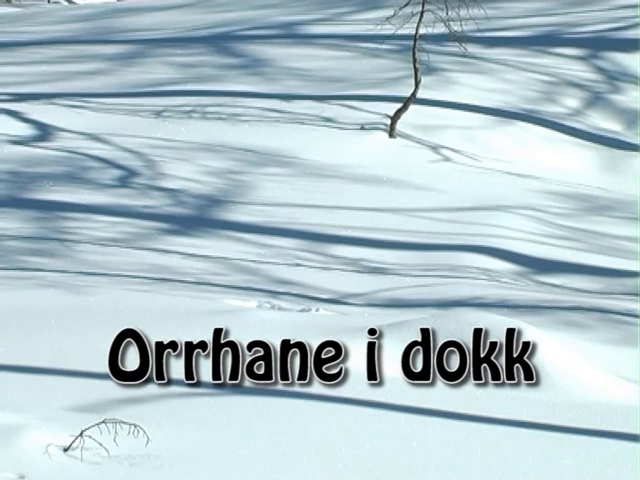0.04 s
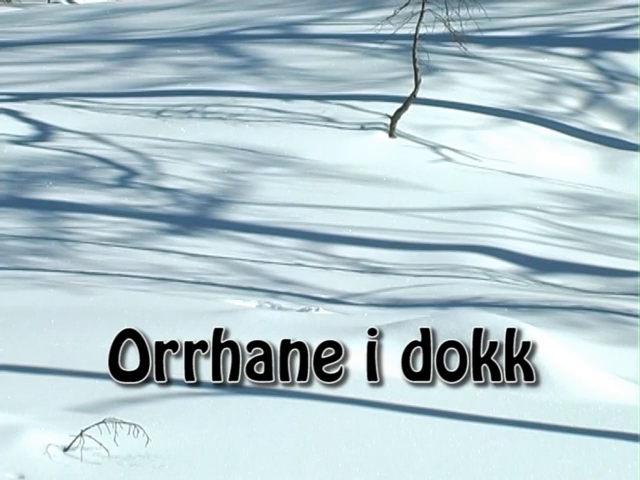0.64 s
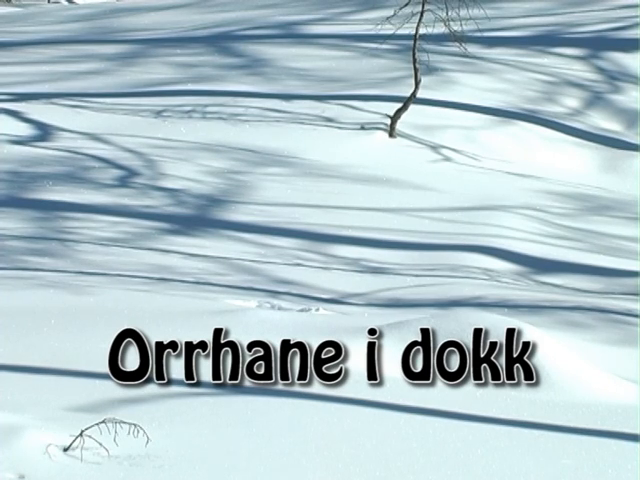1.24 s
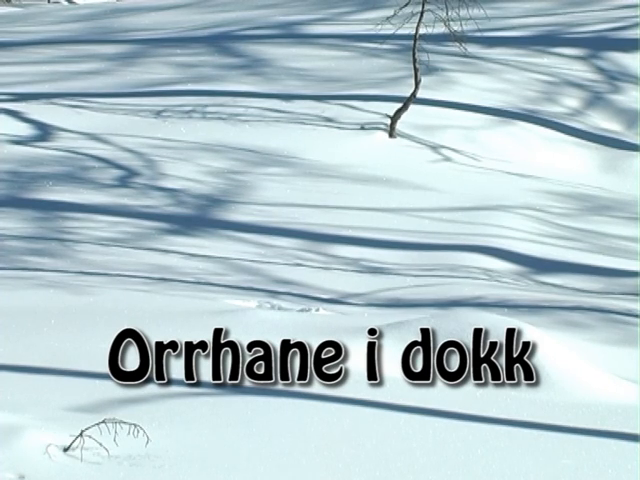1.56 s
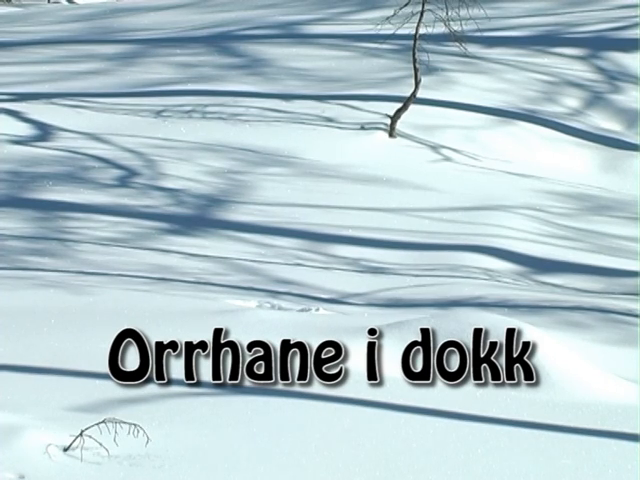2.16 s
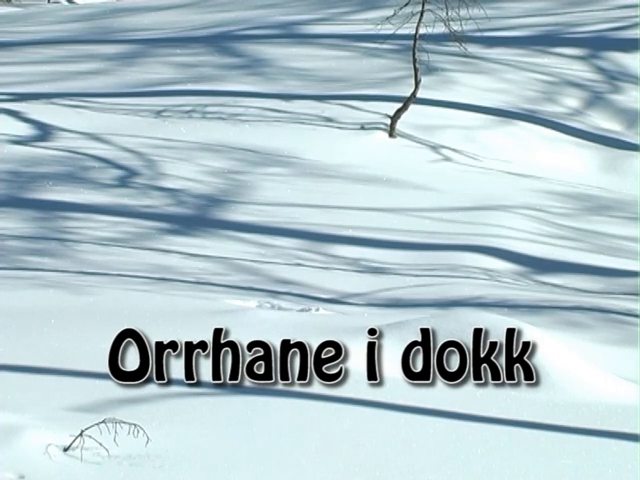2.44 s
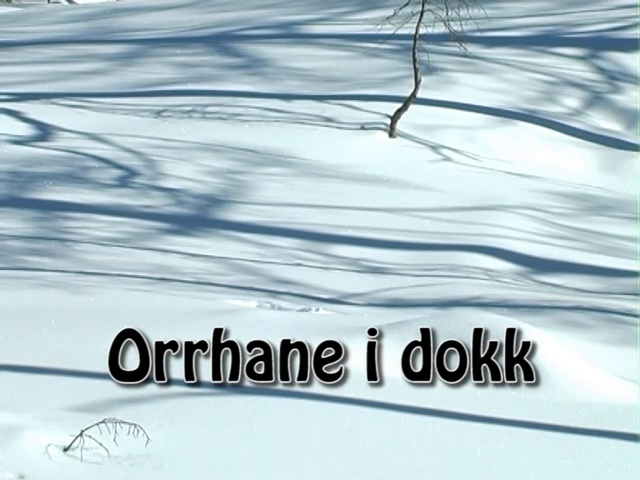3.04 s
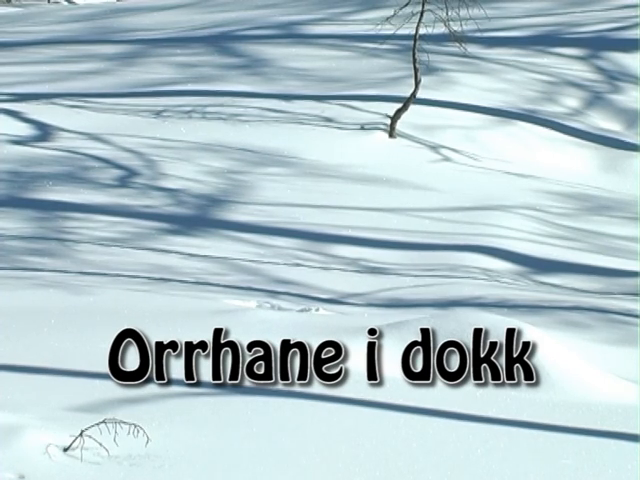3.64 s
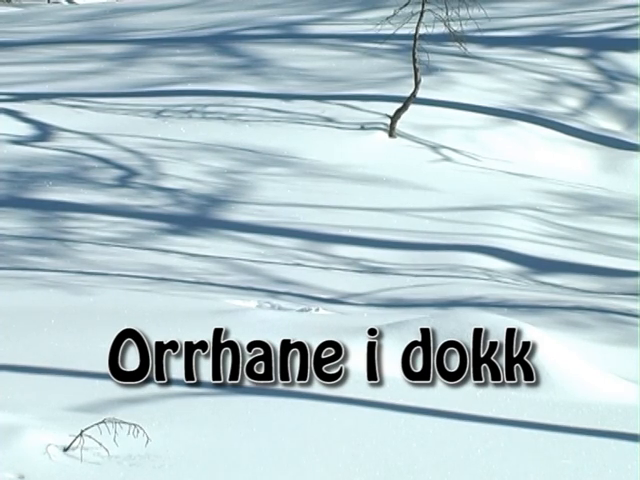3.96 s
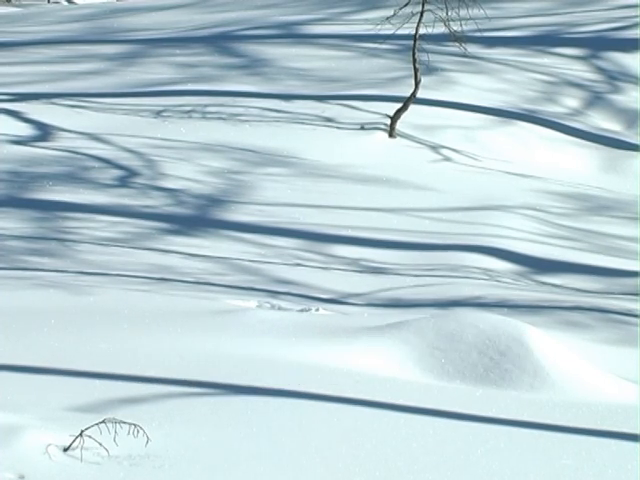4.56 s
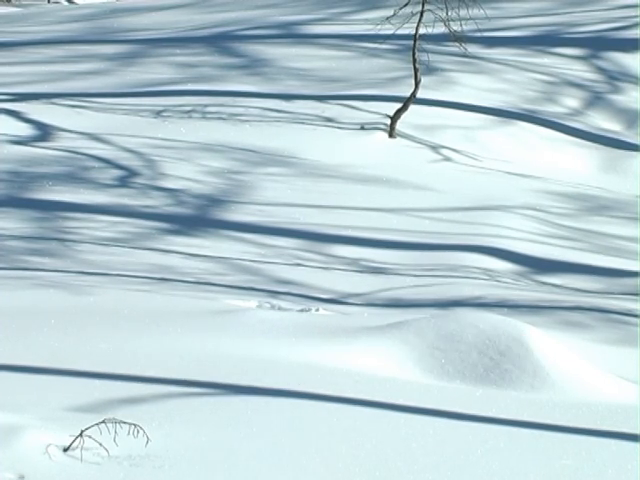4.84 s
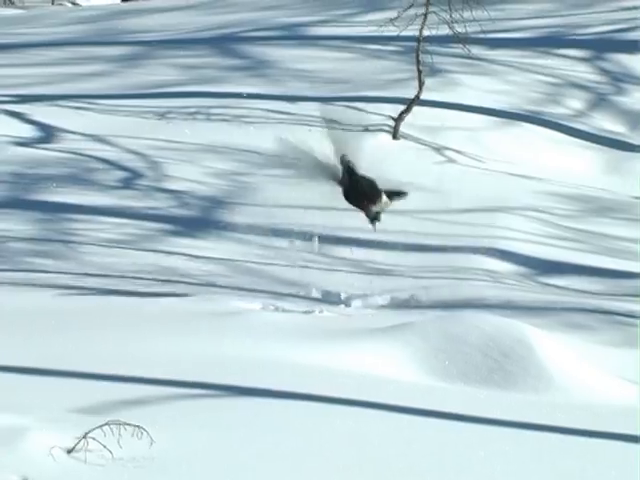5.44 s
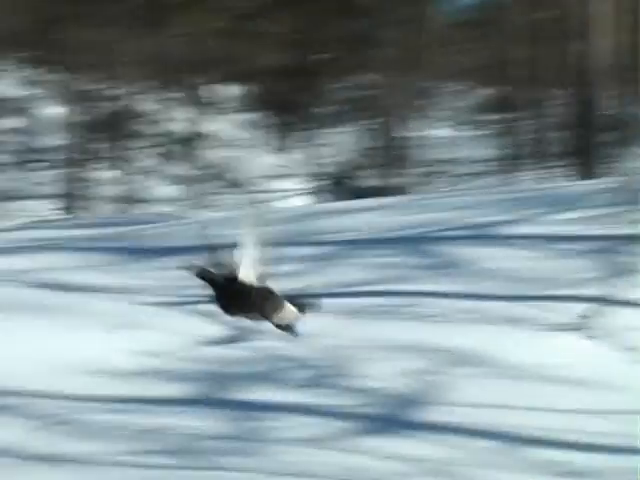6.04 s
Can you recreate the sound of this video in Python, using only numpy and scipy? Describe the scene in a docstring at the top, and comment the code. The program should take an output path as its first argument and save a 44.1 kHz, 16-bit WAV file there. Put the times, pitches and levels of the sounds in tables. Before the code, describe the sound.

In a hushed winter wood, a large bird bursts out of crusted snow and flies off with rapid, thumping wingbeats.

```python
"""A quiet winter wood, where a black grouse buried in snow stirs, breaks the crust and flies off.
The crust snaps and scrapes, and grains of ice rub together as the loose snow sprays and settles.
Each wingbeat, about 8.5 a second, is a sharp flick of feathers and then a thumping push of air.
The bird clucks once in flight, and the tree trunks echo faintly. Under it all lie distant air
and the soft hiss, hum and whine of electrical equipment."""
import sys
import numpy as np
from scipy import signal
from scipy.fft import rfft, irfft, next_fast_len
from scipy.io import wavfile

SR = 44100
rng = np.random.default_rng(int(sys.argv[2]) if len(sys.argv) > 2 else 0)


def wav_out(sig):
    """Save sig, one row per channel (or a flat mono array), as 16-bit PCM at SR to the path in sys.argv[1]."""
    wavfile.write(sys.argv[1], SR, np.round(np.clip(np.atleast_2d(sig).T, -1, 1) * 32767).astype(np.int16))


N = 277389
TIME = np.arange(N) / SR


def amp(db):
    """Turn decibels into a number to multiply by."""
    return 10 ** (np.asarray(db) / 20)


def unit(x):
    """Scale x to an average strength (rms) of 1."""
    return x / np.sqrt(np.mean(x ** 2) + 1e-20)


def along(points, hz):
    """Read between the rows of a (frequency, value) table, giving each octave equal room."""
    frequencies, values = np.transpose(points)
    return np.interp(np.log(hz + 1), np.log(frequencies + 1), values)


def filtered(x, response):
    """Turn each frequency in x up or down by response(hz)."""
    size = next_fast_len(N + SR // 2)
    return irfft(rfft(x, size) * response(np.fft.rfftfreq(size, 1 / SR)), size)[..., :N]


def coloured(x, spectrum):
    """Give x the tone colour in a table, at strength 1."""
    return unit(filtered(x, lambda hz: amp(along(spectrum, hz))))


def high_passed(x, edge_hz):
    """Weaken the bass below edge_hz."""
    return signal.sosfilt(signal.butter(2, edge_hz, "highpass", fs=SR, output="sos"), x)


def grains(per_second, smooth):
    """Tiny random impacts, mixed with some smooth noise."""
    ticks = (rng.random(N) < per_second / SR) * rng.standard_normal(N)
    return unit(unit(ticks) + smooth * rng.standard_normal(N))


def swell(start, rise, length, fall):
    """Loudness that grows until start, holds, then fades; rise and fall are seconds per 20 dB."""
    before = np.maximum(start - TIME, 0) / rise
    after = np.maximum(TIME - start - length, 0) / fall
    return amp(-20 * (before + after).clip(0, 10))


# Tone colour of the quiet wood: (frequency [Hz], relative level [dB])
AIR_COLOUR = [(25, -1.5), (55, -14), (100, -4.5), (190, 0.5), (380, 1.5), (1000, -4), (2500, -8),
              (6000, -9), (10000, -9.5), (14000, -9.5), (16000, -14)]
# How alike the air sounds on the left and right: (frequency [Hz], likeness [0 to 1])
AIR_LIKENESS = [(100, 0.15), (380, 0.14), (2500, 0.077), (15000, 0.37)]
# Which side the air is louder on: (frequency [Hz], left minus right [dB])
AIR_BALANCE = [(60, -5.5), (240, -2.5), (950, -5), (3770, -4.5), (15000, -1.5)]

def still_air(air_db=-57):
    """Distant air and microphone hiss make a wide, steady hush."""
    shared, spread = filtered(rng.standard_normal((2, N)), lambda hz: amp(along(AIR_COLOUR, hz)))
    # The less alike the two sides are, the more opposite noise they get.
    spread = filtered(spread, lambda hz: np.tan(np.arccos(along(AIR_LIKENESS, hz)) / 2))
    air = amp(air_db) * np.array([shared + spread, shared - spread]) / np.std(shared)
    return filtered(air, lambda hz: amp(np.outer([1, -1], along(AIR_BALANCE, hz)) / 2))


def hum_and_whine(hum_hz=103.1, hum_db=-63, whine_hz=10733, whine_db=-69):
    """A mechanism rocks two microphones in opposite directions, and electronics whine."""
    hum = np.sin(2 * np.pi * hum_hz * TIME) * np.array([[-.85], [1.15]])
    whine = np.sin(2 * np.pi * whine_hz * TIME)
    return amp(hum_db) * hum + amp(whine_db) * whine


# Hard snaps of crust and quills: (time [s], level [dB])
SNAP_HITS = [(0.5799, -42), (5.1676, -19), (5.485, -22.5), (5.527, -29), (5.5449, -27.5), (5.686, -30.5),
             (6.036, -28), (6.154, -34)]

def snaps():
    """Snow crust and quills give dry cracks, each over in a few thousandths of a second."""
    colour = [(100, -24.5), (500, 1), (1500, 3), (9000, -1.5), (16000, -18)]  # (Hz, dB)
    crack = coloured(rng.standard_normal(N), colour)
    return crack * sum(amp(db) * swell(s, rise=0.00021, length=0.0002, fall=0.0013)
                       for s, db in SNAP_HITS)


# How long the wood echoes: (frequency [Hz], time to fade by 60 dB [s])
ECHO_TIMES = [(200, 0.16), (1500, 0.68), (10000, 0.62)]

def tree_echo(sound):
    """Sound bounces off many trunks and reaches the left and right differently."""
    hz, age, noise = signal.stft(rng.standard_normal((2, SR // 2)), SR, nperseg=256)
    fade = amp(-60 * age / along(ECHO_TIMES, hz)[:, None])
    _, tail = signal.istft(noise * fade, SR, nperseg=256)
    return signal.fftconvolve(sound[None], tail / np.linalg.norm(tail[0]), axes=1)[:, :N]


# Scuffs and creaks of snow before the flight:
# (time [s], relative level [dB], pitch [Hz], pitch spread [octaves], length [s])
SNOW_SCUFFS = [(0.846, -58.5, 4000, 0.69, 0.045), (1.294, -55.5, 1460, 0.56, 0.0065),
               (1.308, -58, 1300, 1.5, 0.063), (1.356, -51.5, 1920, 0.1, 0.0056),
               (1.905, -61.5, 4200, 0.46, .04), (4.7, -42.5, 650, 1.35, 0.0034)]

def scuffs(gain_db=-3):
    """The stirring bird makes small muffled scrapes, each around its own pitch."""
    out = np.zeros(N)
    for s, db, pitch_hz, octaves, length in SNOW_SCUFFS:
        band = lambda hz: np.exp(-(np.log2((hz + 1) / pitch_hz) / octaves) ** 2 / 2)
        scrape = unit(filtered(rng.standard_normal(N), band))
        out += amp(db + gain_db) * scrape * swell(s, rise=0.0206, length=length, fall=0.013)
    return out


# The crust heaves, then bursts: (time [s], level [dB], length [s], time to fade by 20 dB [s])
CRUST_HEAVES = [(4.959, -46.5, 0.083, 0.04), (5.127, -39, 0.095, 0.47)]
# Wings and body sweep through the snow: (time [s], level [dB], length [s])
SNOW_SWEEPS = [(5.173, -32, 0.0051), (5.225, -33, 0.0037), (5.255, -41.5, 0.0067), (5.287, -42.5, .008),
               (5.313, -34, 0.016)]
# Tone colour of loose snow: (frequency [Hz], relative level [dB])
SNOW_COLOUR = [(59, -44), (100, -17), (481, -4), (1130, -3.5), (1550, -2), (3320, 1.5), (4770, -0.5),
               (7290, 2), (10500, -2.5), (13500, -12), (16000, -25)]

def snow_spray():
    """Fine ice grains rub as the crust gives way, surge with each sweep of a wing, and settle."""
    crumble = sum(amp(db) * swell(s, rise=0.066, length=length, fall=settling)
                  for s, db, length, settling in CRUST_HEAVES)
    sweeps = sum(amp(db) * swell(s, rise=0.0028, length=length, fall=0.0066)
                 for s, db, length in SNOW_SWEEPS)
    return (crumble + sweeps) * coloured(grains(per_second=14000, smooth=0.59), SNOW_COLOUR)


# Air streaming through the feathers: (time [s], level [dB])
RUSTLE_LEVELS = [(5.1, -55), (5.16, -45), (5.55, -49.5), (6.29, -48)]
# Tone colour of that rustle: (frequency [Hz], relative level [dB])
RUSTLE_COLOUR = [(59, 4), (100, 4), (676, 5), (1200, 0), (1480, 2), (1680, -1), (4470, -2.5), (10200, -12),
                 (14400, -25.5), (16000, -38)]

def feather_rustle(wake_db=-10, flutter_db=2.5, flutter_hz=110):
    """Passing air rustles the feathers, and each wingbeat stirs them up a little more."""
    stream = amp(np.interp(TIME, *np.transpose(RUSTLE_LEVELS), left=-120))
    wake = sum(amp(db + wake_db) * swell(s, rise=0.0112, length=length, fall=0.04)
               for s, db, *_, length in wingbeats())
    # Feathers catch and let go unevenly.
    wobble = unit(filtered(rng.standard_normal(N), lambda hz: 1 / (1 + (hz / flutter_hz) ** 4)))
    flutter = unit(amp(flutter_db * wobble))
    return (stream + wake) * flutter * coloured(grains(per_second=5000, smooth=0.43), RUSTLE_COLOUR)


# Tone colour of a moving wing: (frequency [Hz], relative level [dB])
WING_COLOUR = [(47, -55), (80, -44), (212, 0), (461, 4.5), (958, 7), (1140, 2.5), (1370, 2.5), (1630, -2.5),
               (1900, 3), (2080, -2.5), (2600, -2.5), (5770, -13.5), (7360, -13.5), (13100, -24),
               (16000, -43)]

def wing_noise(low_hz, high_hz):
    """Feathers slip over each other: a low push of air, a middle whoosh and a high rasp."""
    noise = coloured(grains(per_second=5000, smooth=0.97), WING_COLOUR)
    push = filtered(noise, lambda hz: 1 / (1 + (hz / low_hz) ** 6))
    rasp = filtered(noise, lambda hz: 1 - 1 / (1 + (hz / high_hz) ** 4))
    return unit(push), unit(noise - push - rasp), unit(rasp)


# Wingbeats: (downstroke time [s], level [dB], extra thump and push [dB], flick level [dB])
BEATS = [(5.175, -35, 0, -40.5), (5.244, -34, -1.5, -49), (5.366, -27.5, -0.5, -33),
         (5.483, -31, -1.5, -38.5), (5.599, -33, 5.5, -35.5), (5.714, -35, 4.5, -36.5),
         (5.831, -38, -0.5, -42.5), (5.950, -39, 3, -41.5), (6.065, -40.5, -2, -39.5),
         (6.186, -41.5, 2, -41), (6.301, -40.5, 3, -41.5)]

def wingbeats(airborne_s=5.3, first_length_s=0.0068, growth=0.0159):
    """Each beat's row, plus seconds flown and stroke length: strokes lengthen once in the air."""
    for beat in BEATS:
        flown = max(beat[0] - airborne_s, 0)
        yield (*beat, flown, first_length_s + growth * flown)


def wing_flicks(lead_s=0.0295, fold_pause_s=0.024, fold_db=-11):
    """The wing tips flip over before each downstroke and fold after it, moving little air."""
    push, whoosh, rasp = wing_noise(low_hz=410, high_hz=3180)
    turns = np.zeros(N)
    for s, db, _, flick_db, _, length in wingbeats():
        fold_s = s + length + fold_pause_s
        turns += amp(flick_db) * swell(s - lead_s, rise=0.00026, length=0.0043, fall=0.032)
        turns += amp(db + fold_db) * swell(fold_s, rise=0.0012, length=0.004, fall=0.028)
    return turns * (amp(-8) * push + amp(-1) * whoosh + amp(-5) * rasp)


def downstrokes(thump_hz=265, thump_width_s=0.0033, rasp_db=-11, rasp_db_per_s=7):
    """Each stroke throws one lump of air, then the swirls behind the feathers die away."""
    push, whoosh, rasp = wing_noise(low_hz=403, high_hz=3270)
    out = np.zeros(N)
    for s, db, air_db, _, flown, length in wingbeats():
        t = TIME - s - length / 3  # the thump peaks a third of the way into the stroke
        bump = np.exp(-(t / thump_width_s) ** 2 / 2)
        thump = bump * np.sin(2 * np.pi * (thump_hz * t + rng.random()))
        air = amp(1.5) * thump + amp(-5) * push * swell(s, rise=0.012, length=length, fall=0.015)
        feathers = whoosh * swell(s, rise=0.0093, length=length, fall=0.018)
        rasp_gain = amp(rasp_db + rasp_db_per_s * flown)  # raspier as the wings get clear of the snow
        feathers += rasp_gain * rasp * swell(s, rise=0.0021, length=length, fall=0.013)
        out += amp(db) * (amp(air_db) * air + feathers)
    return out


# Overtones at 2, 3 and 4 times the cluck's pitch: (starting level against the main note [dB])
CLUCK_OVERTONES = [4.25, 0, -17]

def cluck(start_s=5.968, length_s=0.059, start_db=-42.5, top_hz=492, roughness=0.027):
    """The bird calls one slightly rough note that grows louder while its overtones fade."""
    age = np.clip(TIME - start_s, 0, length_s)
    pitch_hz = top_hz - 52000 * (age - 0.011) ** 2  # an arch, highest 0.011 s into the note
    waver = unit(filtered(rng.standard_normal(N), lambda hz: hz < top_hz / 2))
    phase = 2 * np.pi * np.cumsum(pitch_hz * (1 + roughness * waver)) / SR
    overtones = sum(amp(db) * np.sin(k * phase) for k, db in enumerate(CLUCK_OVERTONES, 2))
    voice = np.sin(phase) + overtones * amp(-380 * age)
    loudness = amp(start_db + 115 * age) * swell(start_s, rise=0.014, length=length_s, fall=0.0052)
    return voice * loudness


def scene(echo_db=-16, wing_edge_hz=160):
    """The bird is a little to the right, among the trees, over a steady background."""
    bird = downstrokes() + wing_flicks() + snaps() + snow_spray() + feather_rustle() + scuffs() + cluck()
    bird = high_passed(bird, wing_edge_hz)  # its wings are too small to make deep bass
    pan = amp([[-2.2], [2.2]])  # left, right
    return (bird + amp(echo_db) * tree_echo(bird)) * pan + still_air() + hum_and_whine()


def record(dry, silent_s=0.036, bass_hz=55, top_hz=15850):
    """Open with an instant of silence, and trim the deepest bass and the highest treble."""
    sound = high_passed(dry * (TIME > silent_s), bass_hz)
    return filtered(sound, lambda hz: hz < top_hz)


dry = scene()
out = record(dry)
wav_out(out)
```